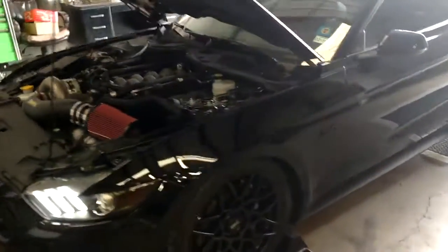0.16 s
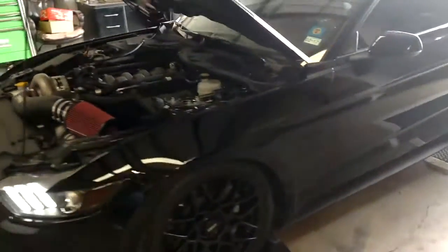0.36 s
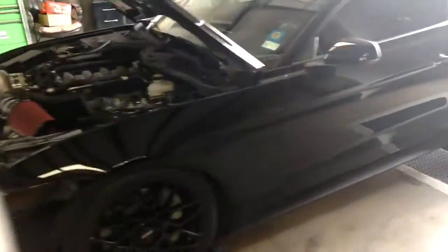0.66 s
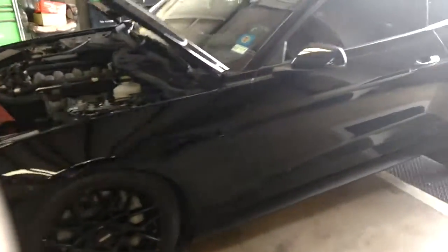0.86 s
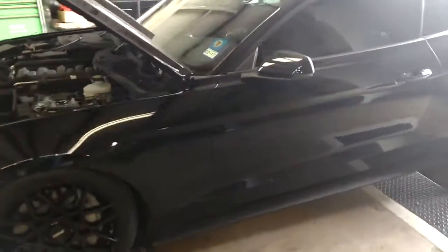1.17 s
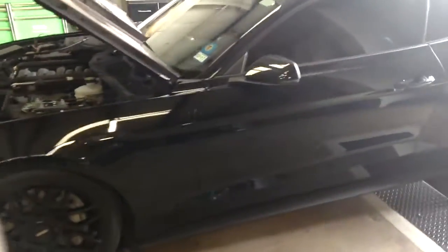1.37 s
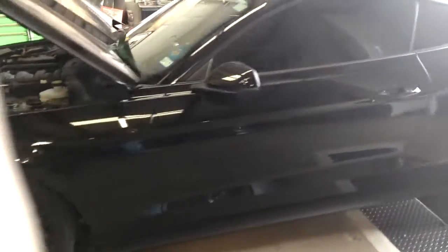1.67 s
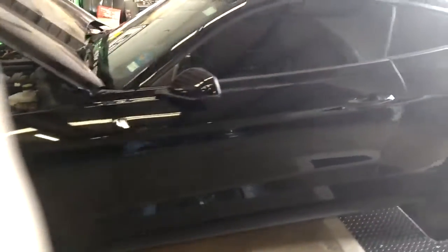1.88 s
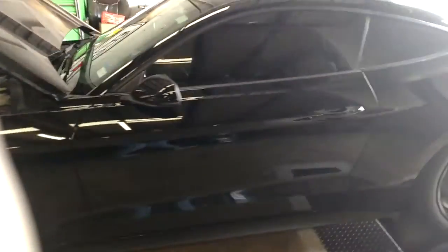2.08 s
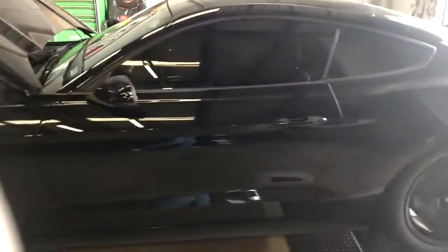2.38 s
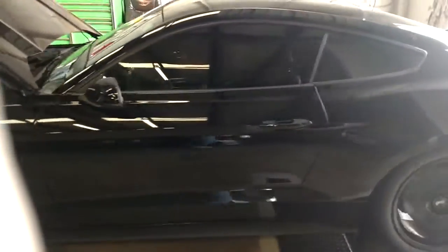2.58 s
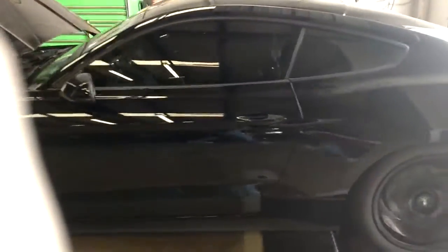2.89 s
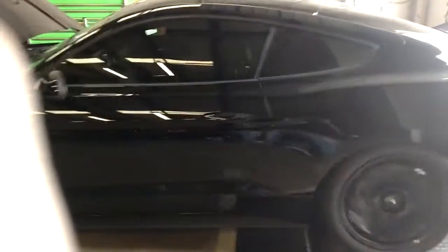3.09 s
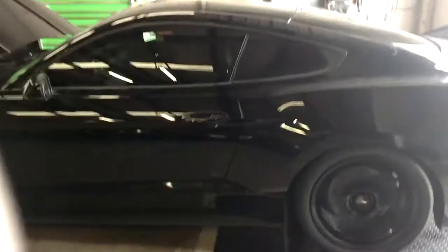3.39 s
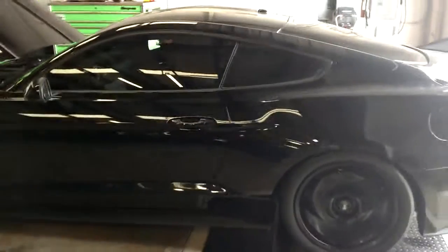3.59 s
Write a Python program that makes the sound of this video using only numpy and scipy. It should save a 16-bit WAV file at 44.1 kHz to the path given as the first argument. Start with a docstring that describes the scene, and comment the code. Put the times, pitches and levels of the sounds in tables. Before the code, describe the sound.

Loud engine on rollers holds a deep drone under rushing fans, then opens to full-throttle roar

```python
"""Workshop with a dynamometer: a supercharged V8, heard by a phone carried from bonnet to rear wheel.
Light load: droning multiples of the engine cycle under coloured noise (fans, tyres) and thin wavering whine.
Throttle opening: firing pulses ring resonances into a bark and the tone pattern shifts.
Full load: the revs climb and puffed noise turns the exhaust to a hard roar; the pulses echo in the room."""
import sys
import numpy as np
from scipy import signal
from scipy.fft import rfft, irfft
from scipy.io import wavfile
from scipy.ndimage import uniform_filter1d

SR = 44100
rng = np.random.default_rng(int(sys.argv[2]) if len(sys.argv) > 2 else 0)


def persist_wave(psi):
    """Save psi, clipped to +-1, as 16-bit WAV."""
    counts = np.round(np.clip(psi, -1, 1) * 32767).astype(np.int16)
    wavfile.write(sys.argv[1], SR, np.atleast_2d(counts).T)


N = 164493

# Order = multiple of the engine cycle. Level curves are gains on top of the spectra.
# Fans, tyres and belts, spectrum: f/Hz, density/(dB per Hz)
FANS_SPECTRUM = [(30, -79), (80, -66.5), (130, -55), (330, -52), (540, -60.5), (830, -53), (1100, -58.5),
                 (1600, -69), (1950, -69.5), (2900, -60.5), (3600, -65), (5600, -65.5), (7500, -68.5),
                 (9500, -71.5), (11500, -76), (15500, -82)]
# Their level: t/s, level/dB
FANS_LEVEL = [(0, 0.5), (.4, 0.5), (.9, 0.5), (1.4, -0.5), (1.8, 0.5), (2.2, 0), (2.33, -7), (3.73, -15)]
# Their stereo width: f/Hz, side-mid/dB
FANS_WIDTH = [(60, 0), (200, -0.5), (700, -17), (1300, -10), (4400, -3.5), (15000, 0.5)]
# Blower whine: order, level/dB
WHINE_TONES = [(283.5, 0), (296, -6)]
# Whine level: t/s, level/dB
WHINE_LEVEL = [(0, -36), (.25, -39), (.42, -31), (.7, -35), (1.1, -36.5), (1.5, -41), (1.85, -37),
               (2.25, -40), (2.45, -67)]
# Engine speed: t/s, firing rate/Hz
FIRING_RATE = [(0, 160.25), (.5, 160.5), (1, 161.35), (2, 162.75), (2.25, 163.5), (2.35, 165.5),
               (2.5, 170.5), (3, 182.5), (3.73, 202.5)]
# Exhaust tones: order, light-load level/dB, full-load level/dB
EXHAUST_TONES = [(6, -37.5, -48), (7, -34, -50), (8, -35, -38), (9, -34, -48), (10, -33, -43),
                 (11, -32, -39), (13, -38, -39), (14, -31, -39), (15, -29.5, -41), (16, -20, -26.5),
                 (18, -34, -44), (19, -41, -36), (21, -44, -44), (24, -46, -41), (26, -43, -47),
                 (31, -48, -41), (32, -42, -37.5), (37, -43, -35), (39, -45, -37), (40, -41, -37),
                 (42, -38, -42), (56, -54, -36), (63, -59, -41), (70, -56, -43), (71, -57, -43)]
# Gain of the drone, the tone at twice the firing rate: t/s, level/dB
DRONE_LEVEL = [(0, 0.5), (.33, -1), (.55, 3.5), (.9, 1.5), (1.3, -3), (1.65, -1), (1.95, 1.5), (2.22, -1),
               (2.325, 5.5), (2.37, -1.5), (2.5, 0.5), (2.75, 4.5), (3.05, -6), (3.4, 3.5), (3.73, 1)]
# Gain of the boom, the tones below the drone in pitch: t/s, level/dB
BOOM_LEVEL = [(0, -4), (.5, -4), (1.1, 1), (1.6, -1.5), (2.3, 0.5), (2.7, 5), (3.73, -0.5)]
# Tone swells at resonances of pipes and workshop: order, t/s, length/s, lift/dB
TONE_SWELLS = [(26, .15, .2, 9), (32, .68, .22, 8), (37, 1.03, .25, 11.5), (37, 1.7, .14, 12),
               (42, .95, .2, 4), (10, 1.1, .3, 4), (21, 2.13, .2, 12), (32, 2.345, .04, 19),
               (42, 2.385, .02, 21), (31, 2.48, .13, 14), (39, 2.74, .1, 15), (40, 3.02, .18, 7),
               (32, 3.1, .16, 10), (32, 3.62, .15, 8), (24, 3.35, .35, 15), (8, 3.27, .2, 5),
               (63, 3.12, .12, 15), (70, 3.38, .22, 15), (71, 3.28, .17, 13)]
# Tone phase between left and right: f/Hz, light load/rad, full load/rad
STEREO_PHASE = [(123, 1.4, 3.16), (195, 0.88, 2.15), (330, 0.97, 1.9), (760, 0.42, 0.19),
                (1510, 0.34, 0.41)]
# Light-load tone imbalance, before the share: f/Hz, L-R/dB
STEREO_BALANCE = [(120, -10.5), (200, -3.5), (330, -4), (700, -0.5)]
# Share of the imbalance as the phone moves along the car: t/s, share/1
BALANCE_SHARE = [(0, -0.98), (.4, 0.81), (1, 0.23), (1.6, 1.74), (2.1, 0.85), (2.6, 3.2)]
# Firing pulses in the pipes, spectrum: f/Hz, density/(dB per Hz)
RASP_SPECTRUM = [(70, -90), (150, -71.5), (300, -47), (600, -51), (900, -49.5), (1150, -54.5),
                 (1600, -50.5), (2800, -58.5), (6000, -86)]
# Their level: t/s, level/dB
RASP_LEVEL = [(0, -6), (2.22, -12.5), (2.35, -1.5), (2.5, -1), (2.7, -0.5), (3.73, -0.5)]
# Pipe resonances: f/Hz, width/Hz, peak density/(dB per Hz), strongest t/s, length/s
PIPE_RINGS = [(663, 115, -49.5, 2.56, 0.3), (880, 76, -49.5, 2.51, 0.31), (1697, 160, -45.5, 3.25, 0.3),
              (2643, 150, -51, 3.31, 0.71)]
# Bark resonances: f/Hz, width/Hz, peak density/(dB per Hz), start t/s, end t/s (end before start: silent)
BARK_RINGS = [(311, 112, -37.5, 2.255, 2.39), (637, 88, -39.5, 2.31, 2.395), (830, 230, -45, 2.335, 2.4),
              (1340, 220, -53, 2.33, 1.9)]
# Exhaust gas at full load, spectrum: f/Hz, density/(dB per Hz)
GAS_SPECTRUM = [(50, -75), (110, -58), (180, -49), (380, -59), (600, -66), (870, -48.5), (1120, -53),
                (1650, -45.5), (2050, -52), (2650, -56), (3300, -51.5), (4100, -56.5), (5100, -54),
                (6200, -60), (7400, -58), (9000, -62.5), (12000, -66), (15500, -72)]
# Gas level, multiplied further for the hiss: t/s, level/dB
GAS_LEVEL = [(2.3, -42), (2.355, -15), (2.367, -4.5), (2.45, -8.5), (2.51, -6), (2.6, -2.5), (2.78, -0.5),
             (2.92, -1), (3.12, 0.23), (3.45, 0.5), (3.73, 0.5)]
# Stereo width of gas and pulses: f/Hz, side-mid/dB
GAS_WIDTH = [(100, 30), (200, 12), (380, 2.5), (700, -7), (1050, -13), (1700, 6.5), (2400, -4.5),
             (4400, -5.5), (8000, -0.5), (15000, 0)]
# Microphone notches (positive depth lifts): f/Hz, width/Hz, bonnet depth/dB, rear depth/dB
MIC_NOTCHES = [(2056, 146, -53, -3.5), (2178, 107, -10.5, -12.5), (4373, 182, -17.5, -5),
               (6400, 110, 4, -14), (10500, 170, -16, 0), (12800, 110, 1, -7)]

CYLINDERS = 8
THROTTLE_S, OPENING_S = 2.402, 0.06
WHINE_WAVER_RAD = 1.05
WHISTLE_HZ, WHISTLE_DB = 14063, -56
TONE_WAVER_DB, TONE_WAVER_RAD = 1.5, .15
LOAD_WAVER_RAD = .15  # extra overtone waver at full load
LOPE_SCATTER_RAD = .95  # low tones line up loosely into one thump per engine cycle
CYLINDER_SPREAD_DB, FIRING_SCATTER_DB, JITTER_S = 3.5, 3, .0001
HEADER_SPREAD_S = 0.000801  # unequal pipe lengths make the pulses uneven
ROOM_T60_S, ROOM_DB = 0.54, 7  # echo energy re direct pulse
BARK_RISE_S, BARK_FALL_S = 0.015, .008
PUFF_DEPTH = 0.083
HISS_HZ, HISS_GROWTH_DB_PER_DB = 4400, 1.87  # growth beyond that of the roar
PEAK_LIMIT, TOP_HZ = .95, 15600


def undb(db):
    """Amplitude from dB."""
    return 10 ** (np.asarray(db) / 20)


def clock():
    """Sample times in s."""
    return np.arange(N) / SR


def curve(rows):
    """Straight lines through (t/s, value) rows."""
    return np.interp(clock(), *np.array(rows, float).T)


def at(rows, hz, axis=1):
    """One table column, read on a log-frequency axis."""
    rows = np.array(rows, float)
    return np.interp(np.log(np.maximum(hz, 1)), np.log(rows[:, 0]), rows[:, axis])


def bins():
    """Spectrum bin frequencies in Hz."""
    return np.arange(N // 2 + 1) * SR / N


def filtered(x, gain):
    """Gain per bin, applied to the whole signal."""
    return irfft(rfft(x) * gain, N)


def colour(x, rows):
    """Shapes a white signal of rms 1 to (f/Hz, density/(dB per Hz)) rows."""
    return filtered(x, undb(at(rows, bins())) * np.sqrt(SR / 2))


def ring(x, hz, width_hz, db):
    """Steep-skirted resonance, peaking at db per Hz."""
    shape = 1 / (1 + 1j * (bins() - hz) / width_hz) ** 2
    return filtered(x, undb(db) * np.sqrt(SR / 2) * shape)


def walk(rate_hz):
    """Smooth random waver with spread near 1."""
    hold = int(SR / rate_hz)
    held = np.repeat(rng.standard_normal(N // hold + 2), hold)
    return 1.22 * uniform_filter1d(held, hold)[:N]


def spread(pair, width):
    """Left and right from two signals taken as mid and side."""
    ratio = undb(at(width, bins()))
    mid, side = filtered(pair, np.array([ratio ** 0, ratio]) / np.sqrt(1 + ratio ** 2))
    return np.array([mid + side, mid - side])


def step(when_s, length_s):
    """Smooth rise from 0 to 1 around a moment."""
    return (1 + np.tanh((clock() - when_s) / length_s)) / 2


def throttle():
    """Load from 0 (light) to 1 (full)."""
    return step(THROTTLE_S, OPENING_S)


def fans():
    """Rush of fans and of tyres on rollers: coloured noise, slightly unsteady, fading as the throttle opens."""
    noise = colour(spread(rng.standard_normal((2, N)), FANS_WIDTH), FANS_SPECTRUM)
    return noise * undb(curve(FANS_LEVEL) + 1.03 * walk(24.17))


def blower(cycle):
    """Supercharger whine locked to the engine cycle, plus a faint whistle at one mean pitch."""
    def tone(phase):
        waver = WHINE_WAVER_RAD * np.array([walk(60), walk(60.4)])
        return np.sqrt(2) * np.sin(phase + waver)
    whine = sum(undb(db + 2 * walk(20)) * tone(2 * np.pi * order * cycle) for order, db in WHINE_TONES)
    whistle = undb(WHISTLE_DB) * tone(2 * np.pi * WHISTLE_HZ * clock())
    return whine * undb(curve(WHINE_LEVEL)) + whistle


def exhaust_tones(cycle, cycle_hz, load):
    """Multiples of the engine cycle: loping boom, drone and overtones, in a pattern set by load."""
    t = clock()
    out, drone, boom = 0, curve(DRONE_LEVEL), curve(BOOM_LEVEL)
    sides = np.array([[1], [-1]]) / 2
    lean = sides * curve(BALANCE_SHARE) * (1 - load)
    for order, light_db, full_db in EXHAUST_TONES:
        hz = order * cycle_hz.mean()
        db = light_db + (full_db - light_db) * load
        for lifted, when_s, length_s, lift_db in TONE_SWELLS:
            if lifted == order:
                db = db + lift_db * np.exp(-((t - when_s) / length_s) ** 4)
        start = rng.standard_normal()
        waver_db, waver_rad = TONE_WAVER_DB * walk(5.18), TONE_WAVER_RAD * walk(14)
        if order == 2 * CYLINDERS:
            db, offset = db + drone, np.pi / 2
        elif order < 2 * CYLINDERS:
            db = db + boom + waver_db / 2
            offset = LOPE_SCATTER_RAD * start + waver_rad / 2
        else:
            db = db + waver_db
            offset = np.pi * start + waver_rad + LOAD_WAVER_RAD * load * walk(40)
        lag = at(STEREO_PHASE, hz) * (1 - load) + at(STEREO_PHASE, hz, axis=2) * load
        phase = 2 * np.pi * (order * cycle % 1) + offset + sides * lag
        level = undb(db + lean * at(STEREO_BALANCE, hz))
        out = out + np.sqrt(2) * level * np.sin(phase.astype(np.float32))
    return out


def firings(cycle):
    """One pulse per firing, uneven by cylinder, echoing in the workshop; mid and side, rms 1."""
    t = clock()
    k = np.arange(1, int(cycle[-1] * CYLINDERS))
    strength, delay = rng.standard_normal((2, CYLINDERS))[:, k % CYLINDERS]
    chance = rng.standard_normal((len(k), 2))
    when_s = np.interp(k / CYLINDERS, cycle, t)
    when_s = when_s + HEADER_SPREAD_S * delay / delay.std() + JITTER_S * chance[:, 0]
    size = undb(CYLINDER_SPREAD_DB * strength + FIRING_SCATTER_DB * chance[:, 1])
    pulses = np.bincount(np.clip(when_s * SR, 0, N - 1).astype(int), size, N)
    decay = np.exp(-np.log(1000) * t[:SR // 2] / ROOM_T60_S)
    room = rng.standard_normal((2, SR // 2)) * decay
    room *= undb(ROOM_DB) / np.sqrt(np.sum(room ** 2, axis=1, keepdims=True))
    room[0, 0] += 1  # direct sound, mid only
    out = signal.fftconvolve((pulses - pulses.mean())[None], room, axes=1)[:, :N]
    return out / out.std(axis=1, keepdims=True)


def exhaust_rasp(cycle):
    """Firings ring the pipes: rasp, timed resonance swells, and a bark that breaks off."""
    t = clock()
    pulses = spread(firings(cycle), GAS_WIDTH)
    out = colour(pulses, RASP_SPECTRUM) * undb(curve(RASP_LEVEL))
    for hz, width_hz, db, when_s, length_s in PIPE_RINGS:
        out += ring(pulses, hz, width_hz, db) * np.exp(-((t - when_s) / length_s) ** 2)
    surge = spread(firings(cycle), GAS_WIDTH)
    for hz, width_hz, db, start_s, end_s in BARK_RINGS:
        gate = step(start_s, BARK_RISE_S) * (1 - step(end_s, BARK_FALL_S))
        out += ring(surge, hz, width_hz, db) * gate
    return out


def gas_roar(cycle):
    """Turbulent gas: noise in one puff per firing, its hiss growing fastest."""
    puffs = 1 + PUFF_DEPTH * np.cos(2 * np.pi * CYLINDERS * cycle)
    puffs = puffs / np.sqrt(np.mean(puffs ** 2))
    gas = colour(spread(rng.standard_normal((2, N)), GAS_WIDTH) * puffs, GAS_SPECTRUM)
    hiss = filtered(gas, 1 - 1 / (1 + (bins() / HISS_HZ) ** 2))
    db = curve(GAS_LEVEL)
    return (gas - hiss) * undb(db) + hiss * undb(db * (1 + HISS_GROWTH_DB_PER_DB))


def scene():
    """All layers, driven by one engine cycle count."""
    cycle_hz = curve(FIRING_RATE) / CYLINDERS
    cycle = np.cumsum(cycle_hz) / SR
    background = fans() + blower(cycle)
    exhaust = exhaust_tones(cycle, cycle_hz, throttle()) + exhaust_rasp(cycle) + gas_roar(cycle)
    return background + exhaust


def record(dry):
    """Phone microphone: notches blend from bonnet to rear with load; peaks rounded, top cut."""
    shapes = np.array([np.exp(-((bins() - hz) / width_hz) ** 2) for hz, width_hz, _, _ in MIC_NOTCHES])
    bonnet_db, rear_db = np.array(MIC_NOTCHES)[:, 2:].T
    bonnet = filtered(dry, undb(bonnet_db @ shapes))
    rear = filtered(dry, undb(rear_db @ shapes))
    heard = bonnet + (rear - bonnet) * throttle()
    heard = heard / (1 + (heard / PEAK_LIMIT) ** 6) ** (1 / 6)
    return signal.sosfilt(signal.ellip(10, .2, 80, TOP_HZ, fs=SR, output="sos"), heard)


dry = scene()
out = record(dry)
persist_wave(out)
```